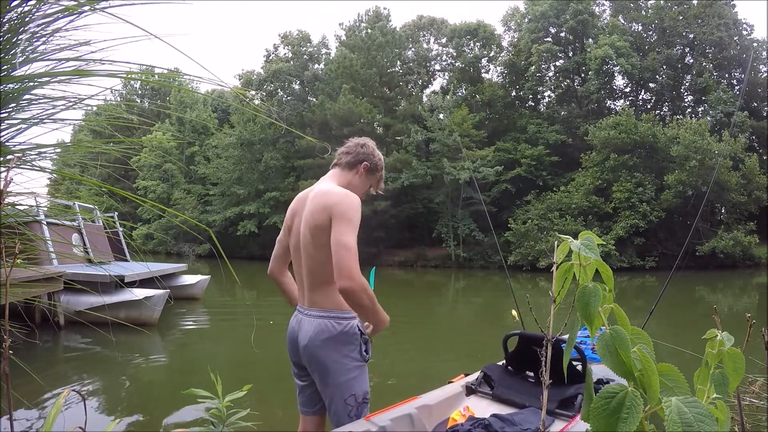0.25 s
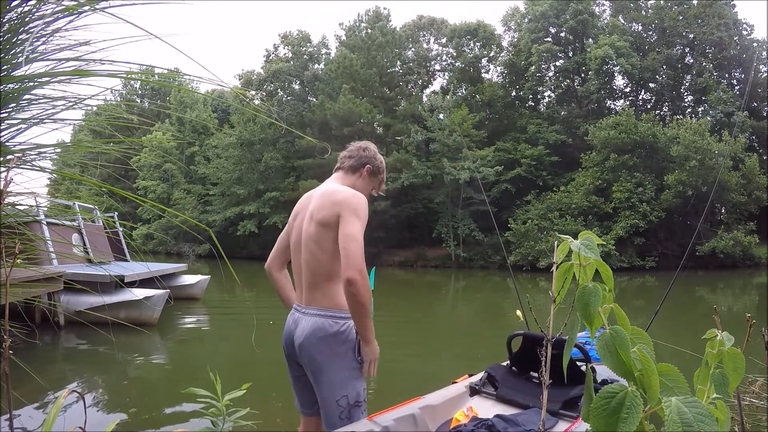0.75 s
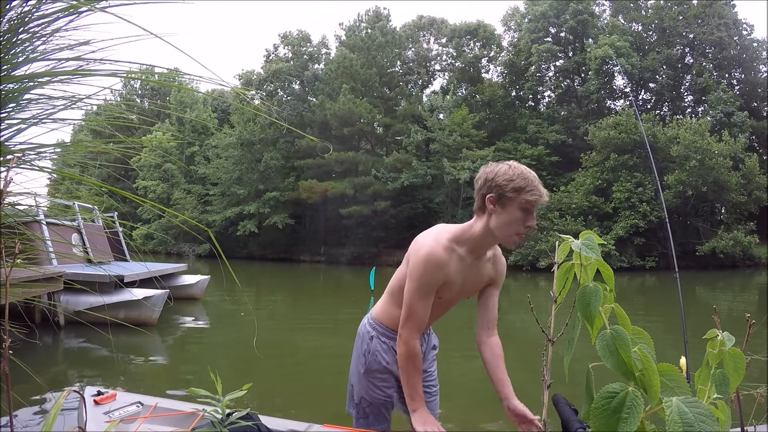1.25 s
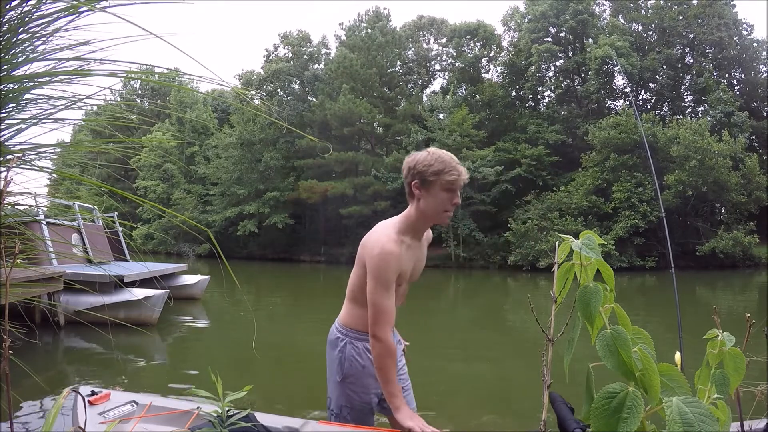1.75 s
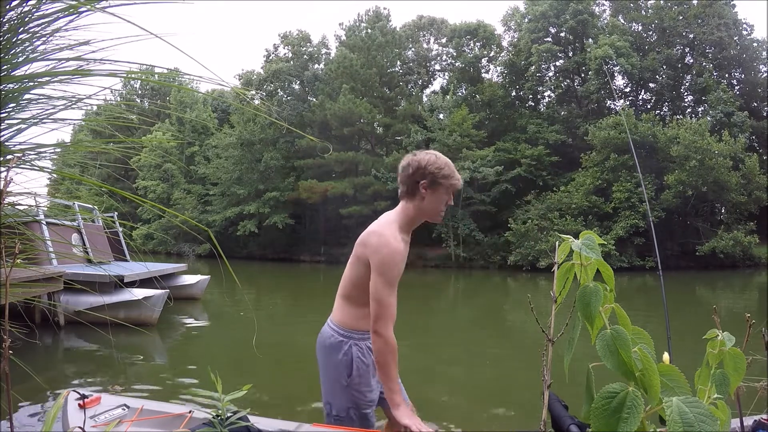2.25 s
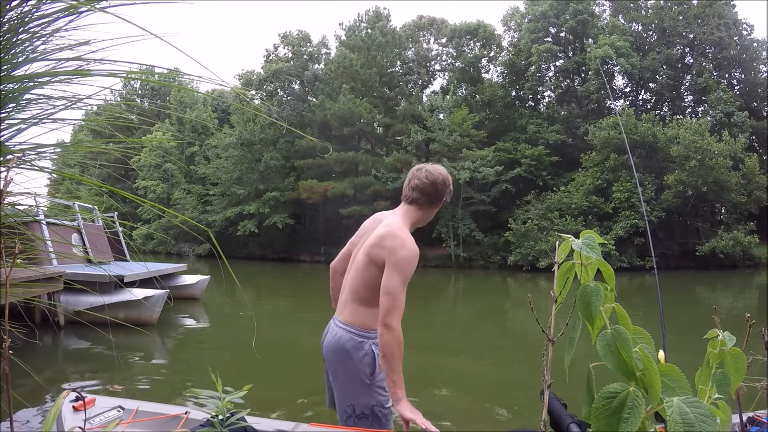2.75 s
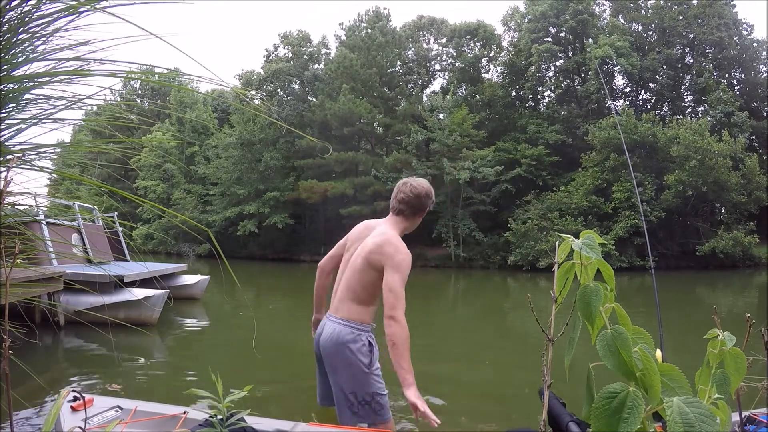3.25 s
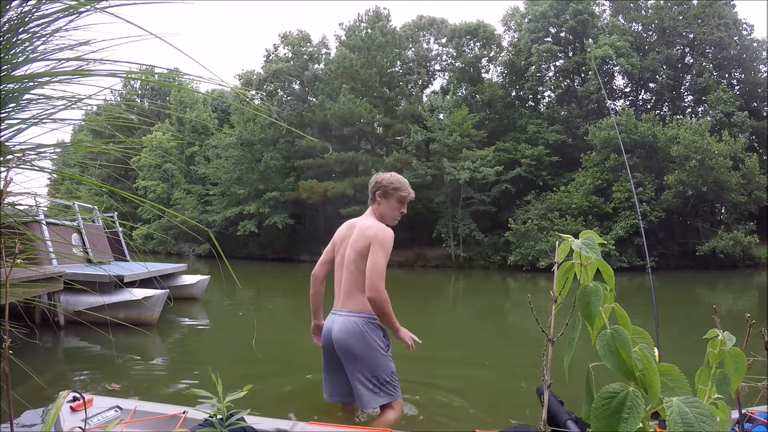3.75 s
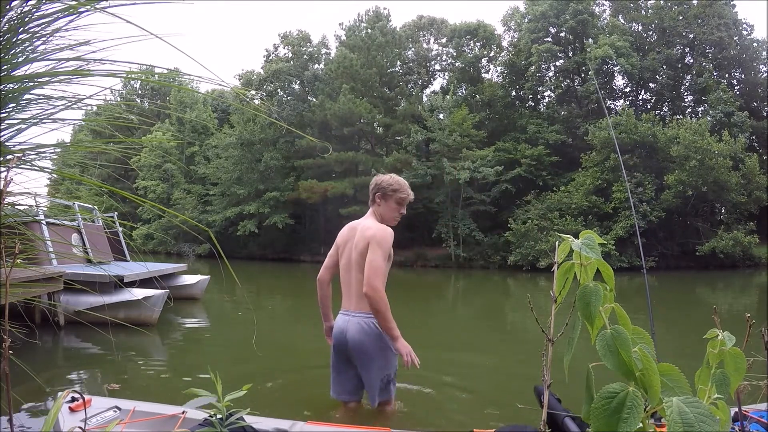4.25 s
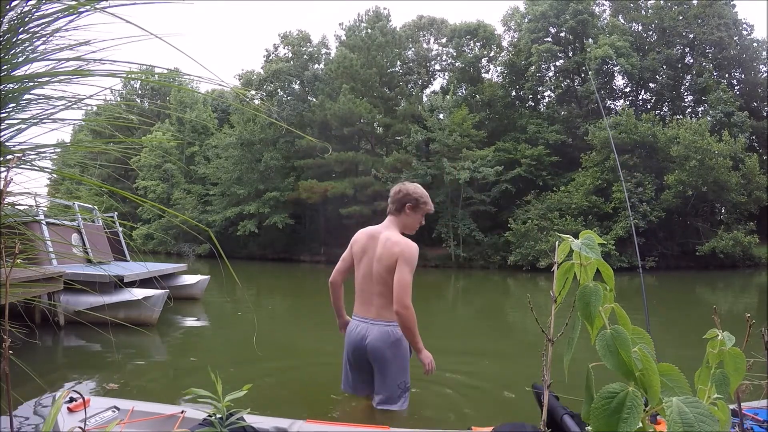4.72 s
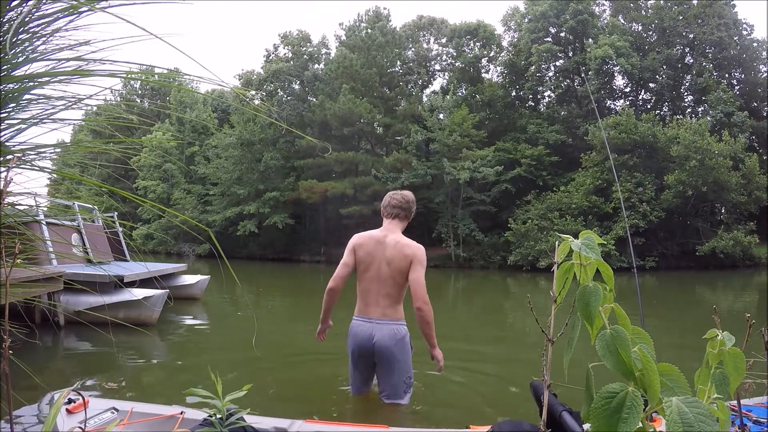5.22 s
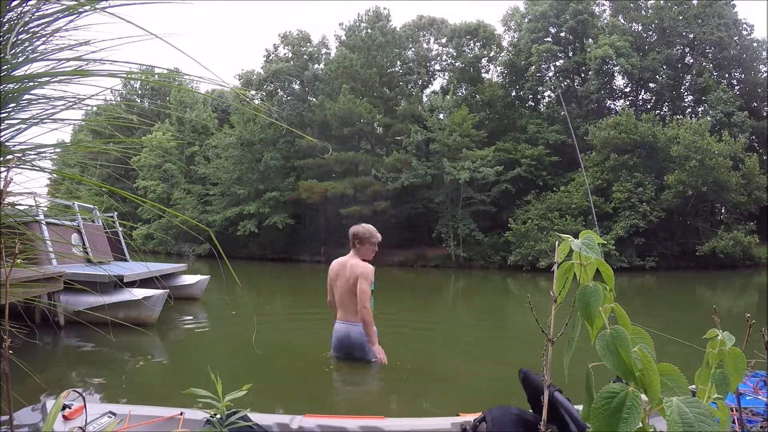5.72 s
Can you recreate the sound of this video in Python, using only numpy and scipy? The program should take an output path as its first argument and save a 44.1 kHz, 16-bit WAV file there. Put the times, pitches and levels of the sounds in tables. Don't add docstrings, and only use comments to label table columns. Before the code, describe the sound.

Wind rumbles on a small microphone by a pond as insects drone, a plastic hull knocks, two wading steps gurgle and small birds whistle.

```python
import sys
import numpy as np
from scipy import signal
from scipy.io import wavfile
from scipy.ndimage import uniform_filter1d

SR = 44100
rng = np.random.default_rng(int(sys.argv[2]) if len(sys.argv) > 2 else 0)


def volts_from_decibels(level):
    exponent = np.asarray(level, float) / 20
    return 10 ** exponent


def int16_out(signal):
    q = np.round(np.clip(np.atleast_2d(signal).T, -1, 1) * 32767)
    wavfile.write(sys.argv[1], SR, q.astype(np.int16))


N = 263718


def evened(x):
    return x / np.sqrt(np.mean(x ** 2) + 1e-20)


def curve(rows):
    seconds, values = np.transpose(rows)
    return np.interp(np.arange(N) / SR, seconds, values)


def played(table, voice, lead_s=0):
    layer = np.zeros(N)
    for s, *settings in table:
        sound = voice(*settings)
        part = layer[round((s - lead_s) * SR):][:len(sound)]
        part += sound[:len(part)]
    return layer


def band(x, lo_hz, hi_hz, order=2):
    sos = signal.butter(order, [lo_hz, min(hi_hz, SR / 2 - 1)], "band", fs=SR, output="sos")
    return signal.sosfilt(sos, x)


def noise(spectrum, size, patchy_db, patch_bins, patch_frames, tilt_db=np.zeros(N)):
    hop = size // 4
    frames, hz = N // hop + 5, np.fft.rfftfreq(size, 1 / SR)
    real, imaginary, patches = rng.standard_normal((frames, len(hz), 3)).T
    patches = uniform_filter1d(patches, round(patch_bins), 0)
    patches = evened(uniform_filter1d(patches, round(patch_frames), 1))
    frame_tilt_db = tilt_db[np.minimum(np.arange(frames) * hop, N - 1)]
    tilt = np.log2((hz + 50) / 1000)[:, None] * frame_tilt_db
    row_hz, row_db = np.transpose(spectrum)
    colour_db = np.interp(np.log(hz + 1), np.log(row_hz + 1), row_db)
    field_db = colour_db[:, None] + patchy_db * patches + tilt
    spectra = (real + 1j * imaginary) * volts_from_decibels(field_db)
    return evened(signal.istft(spectra, nperseg=size, noverlap=size - hop)[1][:N])


# time [s], level [dB].
GUSTS = [(0, -46), (.37, -44), (.65, -46), (.86, -41), (1.0, -46.5), (1.25, -42.5), (1.8, -47),
         (2.3, -42.5), (2.55, -47), (2.8, -39.5), (3.0, -47.5), (3.33, -41.5), (3.7, -50), (3.84, -44),
         (4.3, -43.5), (4.8, -48), (5.0, -42.5), (5.33, -48)]
# pitch [Hz], level [dB per Hz].
WIND_COLOUR = [(9, -42), (15, -11), (26, -2.5), (36, -1.5), (43, 3), (51, 0.5), (64, 1.5), (85, -4),
               (120, -6), (160, -13.5), (240, -19.5), (330, -29), (500, -36.5), (800, -71)]


def wind():
    rumble = noise(WIND_COLOUR, size=4096, patchy_db=.5, patch_bins=6, patch_frames=3)
    deep = signal.sosfiltfilt(signal.butter(2, 80, fs=SR, output="sos"), rumble)
    even = 1 / np.sqrt(uniform_filter1d(deep ** 2, 3000) / np.mean(deep ** 2) + .35)
    gust_db = curve(GUSTS)
    mean_db = np.mean(gust_db)
    roar_db = mean_db + 0.38 * (gust_db - mean_db) + 2.0
    return volts_from_decibels(gust_db + 2.5) * even * deep + volts_from_decibels(roar_db) * (rumble - deep)


# pitch [Hz], rms level [dB], waver of the pitch [Hz].
DRONE = (42.5, -54.5, 2.5)


def drone():
    hz, level_db, waver_hz = DRONE
    waver = evened(band(rng.standard_normal(N), 0.93, 6, order=1))
    turns = np.cumsum(hz + waver_hz * waver) / SR
    return volts_from_decibels(level_db + 0.5) * np.sin(2 * np.pi * turns)


# time [s], level [dB].
RUSTLE = [(0, -66), (.4, -66.5), (1.0, -67.5), (1.7, -63), (2.1, -64), (3.0, -66.5), (3.3, -66.5),
          (4.1, -66), (4.5, -66), (4.9, -68), (5.15, -66)]
# pitch [Hz], level [dB per Hz].
AIR_COLOUR = [(150, -42), (300, 5), (600, 0.5), (1100, -2), (1600, -5.5), (3000, -7.5), (5000, -10),
              (7000, -9), (9000, -30), (12000, -50)]
# pitch [Hz], level [dB per Hz].
HISS_COLOUR = [(2000, -29.5), (5000, -12), (8600, -2), (12000, -4.5), (15300, -7)]


def rustle():
    level_db = curve(RUSTLE)
    tilt_db = -0.09 * (level_db - np.mean(level_db))
    leaves = noise(AIR_COLOUR, size=1024, patchy_db=1.01, patch_bins=14, patch_frames=12, tilt_db=tilt_db)
    own = noise(HISS_COLOUR, size=512, patchy_db=0.79, patch_bins=40, patch_frames=10)
    return volts_from_decibels(level_db + 3.0) * leaves + volts_from_decibels(-73.5) * own


# time [s], level [dB].
CHORUS = [(0, -55.5), (.3, -56.5), (1.5, -57), (3.3, -57.5), (3.8, -57), (5.33, -57)]
# pitch [Hz], level [dB per Hz].
WING_COLOUR = [(4500, -43), (5800, -22.5), (6200, -17.5), (6450, -8), (6650, 4), (6950, 4.5), (7190, -8.5),
               (7320, -20.5), (7520, -16), (7900, -11), (8150, -11.5), (8400, -30), (8700, -43.5)]


def insects():
    hiss = noise(WING_COLOUR, size=512, patchy_db=1.1, patch_bins=4, patch_frames=6)
    throb = evened(band(rng.standard_normal(N), 15, 250, order=1))
    return volts_from_decibels(curve(CHORUS) + 0.63 * throb - 0.16) * hiss


def tick(db, lo_hz, hi_hz, ms):
    t = np.arange(round(ms * SR / 1000) + 90) / SR
    grain_db = 15 * uniform_filter1d(rng.standard_normal(len(t)), 30)
    grit = rng.standard_normal(len(t)) * volts_from_decibels(grain_db)
    swell = np.sin(np.pi * (t / t[-1]) ** 0.4) ** 2
    return 0.98 * volts_from_decibels(db) * evened(band(grit, lo_hz, hi_hz, order=3)) * swell


# start [s], rms level [dB],
# lowest pitch [Hz], highest pitch [Hz], length [ms].
RUBS = [(.4872, -66, 2500, 11000, 1.5), (.7327, -67, 2500, 11000, 1.5), (.158, -59.5, 1220, 4000, 64),
        (.69, -60.5, 900, 2000, 14), (0, -60, 400, 4986, 6.5), (.463, -59.5, 500, 1500, 8),
        (.707, -68, 800, 2500, 9), (2.241, -58.5, 300, 1400, 9.2), (1.725, -62, 3000, 5000, 11),
        (1.772, -65, 2000, 5000, 5.4), (2.244, -52.5, 250, 880, 29), (4.3, -68, 696, 2000, 170),
        (5.196, -60, 2000, 3204, 6.8), (5.204, -56.5, 700, 4200, 15), (5.205, -66, 4200, 6200, 8),
        (5.21, -61, 800, 2700, 48), (5.243, -64, 1800, 6000, 8)]


def rubs():
    return played(RUBS, tick)


# time of the blow [s], peak level [dB], blow length [ms], pitch of the shell [Hz],
# time to ring down by 60 dB [s].
KNOCKS = [(.089, -45, 0.36, 673, 0.024), (.477, -40.5, 0.22, 795, 0.0098), (.4857, -41.5, 0.42, 330, 0.016),
          (.4875, -38.5, 0.5, 1050, 0.026), (.4886, -27, 0.1, 337, 0.019), (.7276, -37.5, 0.21, 450, 0.047),
          (.733, -40.5, 0.57, 1210, 0.016), (.7341, -33, 0.075, 1550, 0.001),
          (2.2458, -32.5, 0.96, 331, 0.03), (2.252, -25.5, 1.8, 86, 0.062), (2.2527, -31, 1.3, 505, 0.026),
          (2.259, -37.5, 0.89, 723, .033), (2.2666, -27, 1.3, 310, 0.016), (2.271, -26.5, 1.8, 137, 0.081),
          (2.793, -29.5, 1.15, 120, 0.037), (4.992, -29.5, 6.6, 70.4, 0.063),
          (5.232, -30.5, 1.7, 128, 0.089)]


def knock(db, blow_ms, hz, t60):
    creak_db = max(-23.0 - 15.0 * blow_ms, -41.0)
    t = np.arange(-400, 6000) / SR
    u = t / blow_ms * 1000
    push = np.exp(-np.sqrt(u ** 2 + 0.03)) - 0.26 * np.exp(-(u / 10.4) ** 2)
    ring = .5 * volts_from_decibels(-60 * t / t60) * np.cos(2 * np.pi * hz * t) * (t > 0)
    ring = ring * (1 - np.exp(-abs(u)))
    fade_s = np.where(t > 0, .04, .03)
    creak = band(rng.standard_normal(len(t)), 300, 3500) * volts_from_decibels(creak_db - 60 * abs(t) / fade_s)
    return volts_from_decibels(db) * (push + ring + 3.54 * creak) * signal.windows.tukey(len(t), .03)


def knocks():
    return played(KNOCKS, knock, lead_s=400 / SR)


def slide(db, from_hz, to_hz, length):
    hz = to_hz + (from_hz - to_hz) * np.linspace(1, 0, round(length * SR)) ** 1.4
    hoarse = 1 + .5 * evened(uniform_filter1d(rng.standard_normal(len(hz)), 40))
    whistle = np.sin(2 * np.pi * np.cumsum(hz) / SR)
    return volts_from_decibels(db) * hoarse * whistle * signal.windows.tukey(len(hz), .6)


# start [s], peak level [dB], first pitch [Hz], last pitch [Hz], length [s].
SLIDES = [
    (.313, -64.5, 4050, 3050, 0.03),
    (4.011, -70.5, 5200, 5000, .014),
    (4.019, -56.5, 6600, 7000, 0.018),
    (3.7, -66.5, 5200, 5800, 0.0144),
]


def far_birds():
    return played(SLIDES, slide)


# start [s], rms level [dB], length [ms].
REEDS = [(.551, -72.5, 7.2), (1.727, -68, 18), (1.77, -64.5, 10), (1.85, -64, 22), (2.222, -69, 6),
         (2.32, -71.5, 25), (2.53, -69.5, 10), (2.942, -64, 11), (4.592, -75, 6), (4.712, -75, 6),
         (4.725, -59.5, 6.7), (4.818, -66.5, 8), (5.205, -64, 11), (5.243, -70.5, 8)]


def reed(db, ms):
    return tick(db, 8350, 14600, ms)


def reeds():
    return played(REEDS, reed)


def bubble(db, hz, t60, rise, wobble=0.028):
    t = np.arange(round(t60 * SR * .6)) / SR
    shape = evened(uniform_filter1d(rng.standard_normal((9000, 2)), 130, 0))[:len(t)].T
    bend = np.clip(rise * 1000 * t, -1, 1) + wobble * shape[0]
    turns = np.cumsum(hz * np.exp(bend)) / SR
    fade_db = -45 * t / t60 - 60 * (t / t60) ** 2
    level = volts_from_decibels(db + fade_db + 1.5 * shape[1]) * (1 - np.exp(-t * hz / .9))
    return 1.1 * level * np.sin(2 * np.pi * turns)


# start [s], peak level [dB], pitch [Hz], pitch rise [natural log per ms].
GURGLES = [(.695, -52.5, 790, -.002), (2.496, -53, 1146, 0.0012), (2.598, -52.5, 632, 0.0023),
           (2.655, -53, 653, -0.002), (2.70, -55, 675, 0.0088), (2.713, -48, 581, 0.019),
           (2.726, -44, 707, 0.0084), (2.742, -52, 520, -0.0055), (2.752, -59, 927, 0.012),
           (2.809, -63, 1160, 0.013), (2.816, -50, 513, .011), (2.837, -47, 1360, .0076),
           (2.842, -53, 736, -0.0059), (2.8819, -41, 560, 0.00022), (2.884, -52, 1026, .002),
           (2.921, -67, 1460, -0.0033), (4.753, -50.5, 900, 0.0014), (4.794, -59, 1315, .001),
           (4.85, -54, 1190, .004), (4.87, -48, 655, -0.0023), (4.87, -49, 1041, 0.002),
           (4.871, -48.5, 428, -0.011), (4.957, -56.5, 610, 0.0053), (5.125, -59.5, 1180, .029)]


def gurgle(db, hz, rise):
    return bubble(db, hz, 0.086 * (hz / 700) ** -0.24, rise)


def gurgles():
    return played(GURGLES, gurgle)


# time [s], height of the jump [dB], time to settle [s].
LEVEL_STEP = (1.19796, -33, .0025)


def level_step():
    at_s, height_db, settle_s = LEVEL_STEP
    away = np.arange(N) / SR - at_s
    return np.sign(away) * np.exp(-abs(away) / settle_s) * volts_from_decibels(height_db) / 2


# start [s], peak level [dB], pitch factor, overtone level [dB].
CHIPS = [
    (1.636, -53, 0.98, -5.5),
    (3.076, -52, 1, -5.5),
    (4.196, -50, .995, -9),
]


def chip(db, pitch, fifth_db):
    length_s, top_s = 0.062, .027
    top_hz, from_hz, to_hz = 3926, 2800, 3324
    t = np.arange(0, length_s, 1 / SR)
    early = t < top_s
    away = np.where(early, 1 - t / top_s, (t - top_s) / (length_s - top_s)) ** 2.1
    hz = top_hz + away * (np.where(early, from_hz, to_hz) - top_hz)
    hz = hz + 28.0 * evened(uniform_filter1d(rng.standard_normal(4000), 90))[:len(t)]
    main_db = away * np.where(early, -21, -19)
    side_db = -1.5 + main_db * np.where(early, 2.0, 2.2)
    over_db = fifth_db - 5.9 * ((t - .013) / .007) ** 2
    turn = 2 * np.pi * np.cumsum(hz * pitch) / SR
    flutter = 2 * np.pi * 315 * t
    sides = np.sin(turn + flutter) + volts_from_decibels(-16.0) * np.sin(turn - flutter)
    call = volts_from_decibels(main_db) * np.sin(turn) + volts_from_decibels(side_db) * sides + volts_from_decibels(over_db) * np.sin(1.47 * turn)
    hoarse_db = 2.4 * evened(uniform_filter1d(rng.standard_normal(len(t)), 80))
    return volts_from_decibels(db + hoarse_db) * call * signal.windows.tukey(len(t), .1)


def near_bird():
    return played(CHIPS, chip)


# start [s], peak level [dB], pitch [Hz], pitch rise [natural log per ms].
DRIPS = [(1.724, -53, 3500, -0.0053), (2.497, -51.5, 1620, 0.016), (2.536, -52, 2390, -0.015),
         (2.708, -51, 1750, -0.0047), (2.717, -49.5, 1910, 0.0029), (2.759, -56, 3400, -.0035),
         (2.762, -62, 4900, .004), (2.851, -52, 2070, 0.0025), (2.858, -56, 3590, .001),
         (2.93, -59, 2056, 0.015), (2.969, -58, 1680, .001), (2.986, -46.5, 3150, -0.018),
         (2.996, -49, 2970, -0.0011), (3.014, -54.5, 3800, 0.0011), (3.098, -51.5, 2415, -.0046),
         (3.113, -59, 2420, .001), (3.49, -60.5, 3900, -0.004), (4.572, -55, 3000, -.001),
         (4.657, -52, 3250, 0.026), (4.694, -56, 3060, 0.039), (4.718, -57.5, 3500, .001),
         (4.773, -56.5, 2257, .0086), (4.788, -53.5, 2350, 0.0078), (4.796, -51.5, 2130, -0.00035),
         (4.924, -60, 1613, -.004), (4.966, -57, 2334, .001), (5.014, -60, 3110, -.01)]


def drip(db, hz, rise):
    return bubble(db, hz, 0.032, rise)


def drips():
    return played(DRIPS, drip)


# start [s], rms level [dB], lowest pitch [Hz], highest pitch [Hz], length [ms].
BURSTS = [(1.724, -66, 3840, 4800, 12), (1.732, -64, 3200, 3800, 10), (1.752, -68, 3800, 4400, 22),
          (1.771, -64, 2300, 2900, 9), (2.697, -68, 4020, 4600, 8), (2.741, -64, 3500, 5200, 10),
          (2.763, -64, 4290, 5800, 7), (2.785, -55, 300, 700, 26), (2.892, -63, 3200, 3800, 8),
          (2.93, -61, 1807, 2600, 24), (2.966, -63, 1900, 2600, 8), (3.012, -60, 3490, 4600, 7),
          (3.026, -65, 3500, 4300, 14), (4.723, -64, 4700, 6200, 6), (4.735, -64, 3200, 4300, 10),
          (4.745, -64, 1796, 2600, 14), (4.835, -65, 1500, 3200, 10), (4.864, -66.5, 2100, 2500, 14),
          (4.924, -67, 2900, 4300, 9), (4.959, -64.5, 3300, 4100, 9), (4.96, -65, 5300, 6400, 6),
          (4.997, -64.5, 4900, 5600, 6), (5.013, -59.5, 2900, 4200, 7), (5.053, -65.5, 4200, 4800, 7),
          (5.055, -64, 1754, 2150, 9)]


def bursts():
    return played(BURSTS, tick)


# time of the peak [s], peak level [dB], rise [dB per s], fall [dB per s].
SURGES = [
    (2.74, -58.5, 96.5, 150),
    (2.87, -57, 120, 121.5),
    (4.79, -65, 56, 63),
    (4.87, -62, 90.5, 91),
    (2.69, -70, 91, 150),
    (2.95, -72, 151, 98),
    (4.95, -62.5, 90.5, 111),
    (1.8, -69.5, 32.5, 32),
]


def slosh():
    swarm, t = np.zeros(N), np.arange(N) / SR
    for place, ringing, rise in rng.random((30, 3)):
        hz = 450 * 5.0 ** place
        voice = bubble(0, hz, (3 + 30 * ringing ** 2) / hz, 0.044 * rise) * (400 / hz) ** .05
        size = volts_from_decibels(3.0 * np.minimum(rng.exponential(1, N), 4))
        starts = rng.random(N) < 130.0 / SR
        swarm += signal.oaconvolve(size * starts, voice)[:N]
    swarm = swarm / np.sqrt(uniform_filter1d(swarm ** 2, 3000) + .1)
    swarm += volts_from_decibels(-8.0) * evened(band(rng.standard_normal(N), 400, 2600))
    push = np.zeros(N)
    for s, db, rise, fall in SURGES:
        push += volts_from_decibels(db - np.where(t < s, rise * (s - t), fall * (t - s)))
    return swarm * push


# start [s], rms level [dB], centre pitch [Hz], length [ms].
SPRAY = [(2.495, -61, 2257, 23), (2.706, -59, 3000, 8), (2.717, -55, 3000, 8), (2.744, -69, 3600, 8),
         (2.762, -65, 4000, 8), (2.845, -64, 2450, 20), (2.881, -50, 960, 13), (2.882, -64, 3000, 5),
         (2.918, -62.5, 3500, 3), (3.1, -63.5, 2430, 12), (4.773, -62, 3400, 6), (4.79, -62, 2600, 18),
         (4.802, -65.5, 3800, 5), (4.845, -62, 1320, 20), (4.96, -66, 2300, 16)]


def spray(db, hz, ms):
    half = 2 ** (1.4 / 2)
    return tick(db, hz / half, hz * half, ms)


def sprays():
    return played(SPRAY, spray)


# start [s], peak level [dB], first pitch [Hz], last pitch [Hz], length [s].
SQUEAKS = [
    (2.842, -58.5, 1800, 3550, .015),
    (2.745, -56.5, 820, 1050, .02),
    (2.645, -65, 1300, 1510, .02),
]


def squeaks():
    return played(SQUEAKS, slide)


# start [s], peak level [dB], pitch [Hz],
# time to ring down by 60 dB [s], pitch rise [natural log per ms].
PINGS = [
    (2.918, -58, 5100, .07, .0005),
    (2.657, -55, 640, .16, .003),
    (4.975, -57, 1100, .15, .002),
    (2.697, -53, 680, .12, -.003),
    (2.684, -43, 1460, .027, .008),
    (4.709, -52, 6000, .022, .0001),
]


def pings():
    return played(PINGS, bubble)


# start [s], rms level [dB], lowest pitch [Hz], highest pitch [Hz], length [ms].
BRUSH = [
    (4.013, -59, 5500, 6400, 16),
    (4.024, -61, 7100, 7900, 16),
    (4.025, -66, 5500, 6500, 100),
    (4.03, -66, 7200, 8300, 80),
    (4.016, -72, 11400, 13400, 50),
]


def wing_brush():
    return played(BRUSH, tick)


# centre [s], half length [s], depth [dB].
TREBLE_DIPS = [
    (4.248, .008, -20),
    (5.229, .004, -11),
    (5.231, .012, -8),
]


def treble_dipped(bed):
    t = np.arange(N) / SR
    dips_db = sum(db * np.exp(-((t - s) / half) ** 2) for s, half, db in TREBLE_DIPS)
    low = signal.sosfiltfilt(signal.butter(6, 2200, fs=SR, output="sos"), bed)
    core = signal.sosfiltfilt(signal.butter(3, [6350, 7250], "band", fs=SR, output="sos"), bed)
    return low + core + volts_from_decibels(dips_db) * (bed - low - core)


def trees(x, t60, echo_s, echo_db):
    taps = np.zeros(SR // 2)
    at = np.arange(500, len(taps) - 20, 20)
    fade = volts_from_decibels(-60 * at / SR / t60)
    taps[at + rng.integers(0, 20, len(at))] = rng.choice([-1., 1.], len(at)) * fade
    taps = taps / np.linalg.norm(taps)
    taps[round(echo_s * SR)] += volts_from_decibels(echo_db)
    return signal.oaconvolve(x, taps)[:N]


def scene():
    water = gurgles() + drips() + bursts() + slosh() + sprays() + squeaks() + pings()
    near = rubs() + knocks() + reeds() + water + wing_brush()
    birds = far_birds() + near_bird()
    wet = volts_from_decibels(-12.5) * trees(birds, t60=.42, echo_s=.052, echo_db=-10)
    wet += volts_from_decibels(-14.5) * trees(near, t60=.2, echo_s=0.0095, echo_db=-6.5)
    beds = wind() + drone() + rustle() + insects()
    return (birds + treble_dipped(near + wet + beds))[None]


def low_pass(x):
    return signal.sosfilt(signal.butter(12, 15400, fs=SR, output="sos"), x)


def record(dry):
    past_end = np.arange(N) / SR - 5.3698
    gate = np.clip(-past_end / .0008, 0, 1)
    smear = volts_from_decibels(-42.0) * np.clip(1 - past_end / .028, 0, 1) * (past_end > 0)
    return low_pass((dry + level_step()) * (gate + smear))


dry = scene()
out = record(dry)
int16_out(out)
```